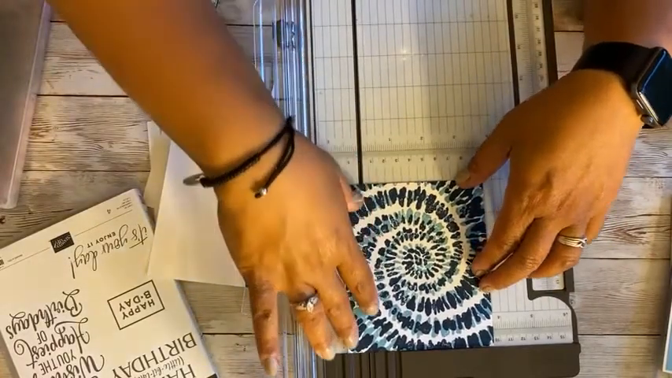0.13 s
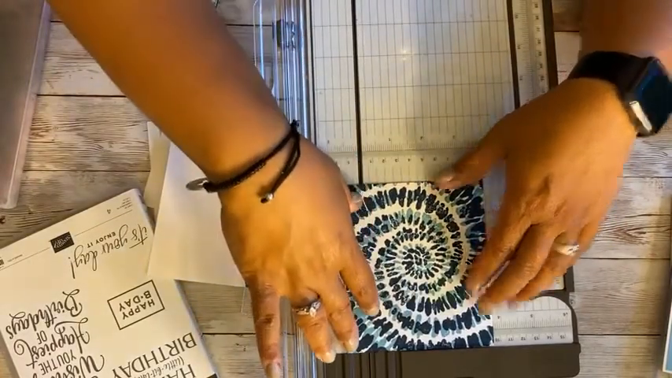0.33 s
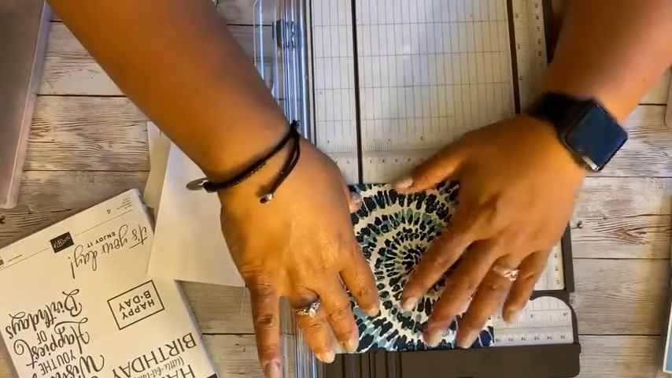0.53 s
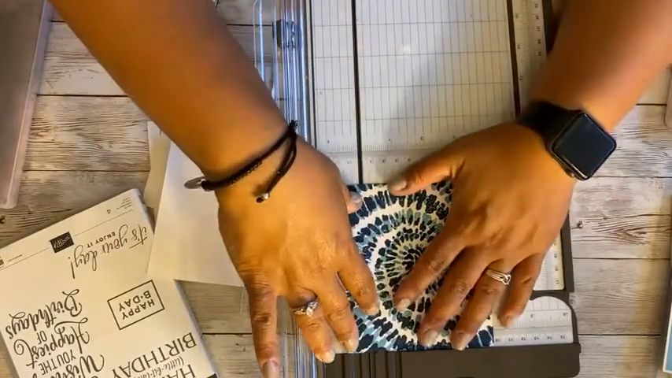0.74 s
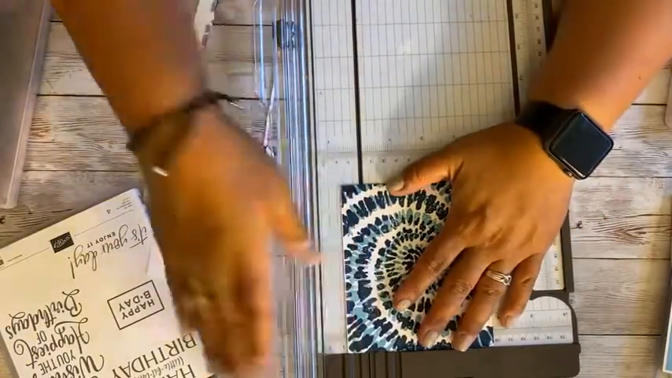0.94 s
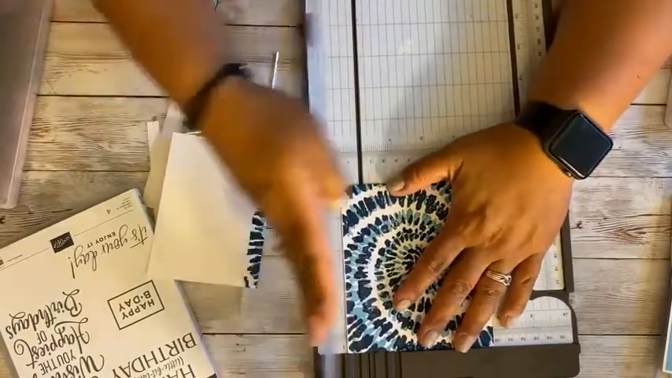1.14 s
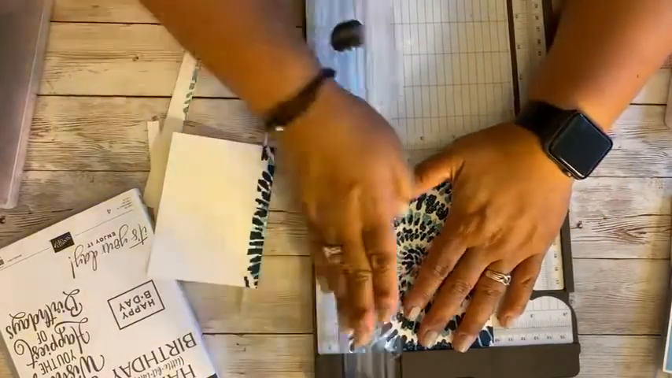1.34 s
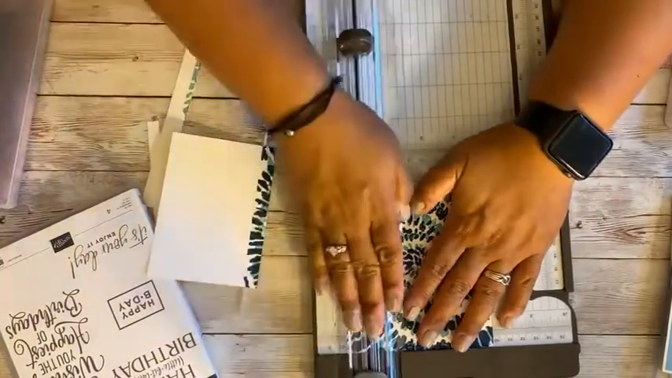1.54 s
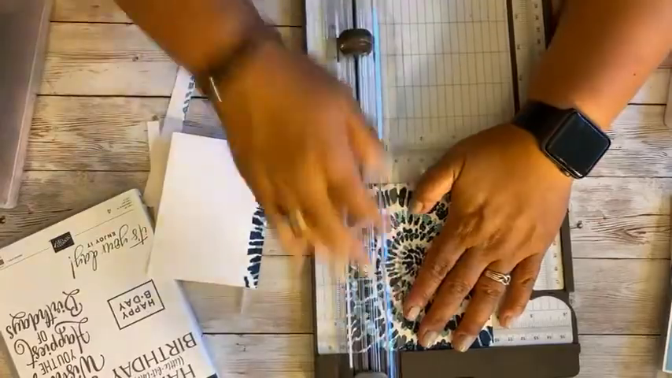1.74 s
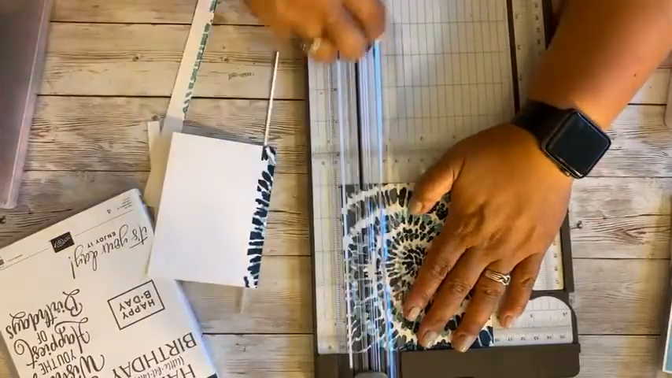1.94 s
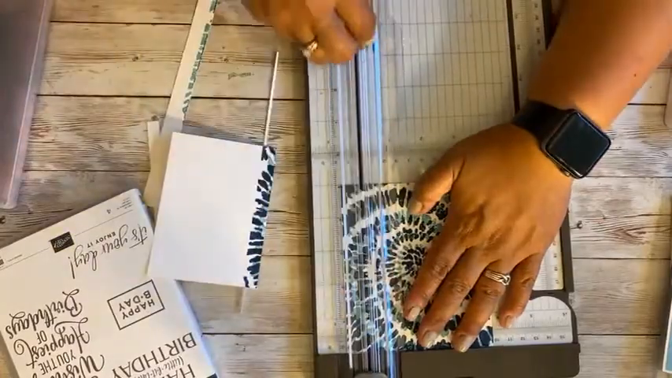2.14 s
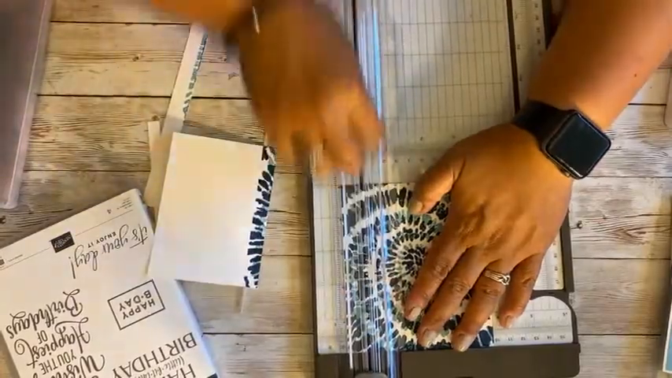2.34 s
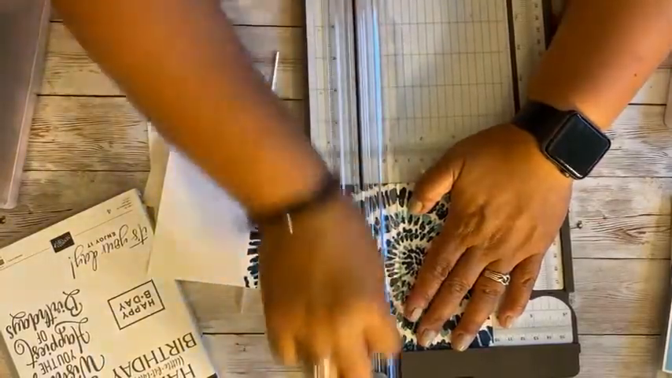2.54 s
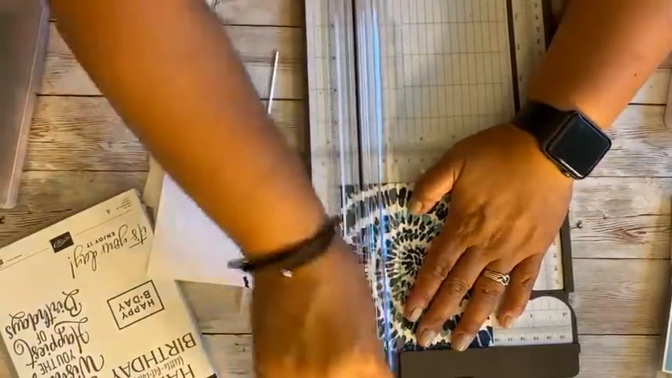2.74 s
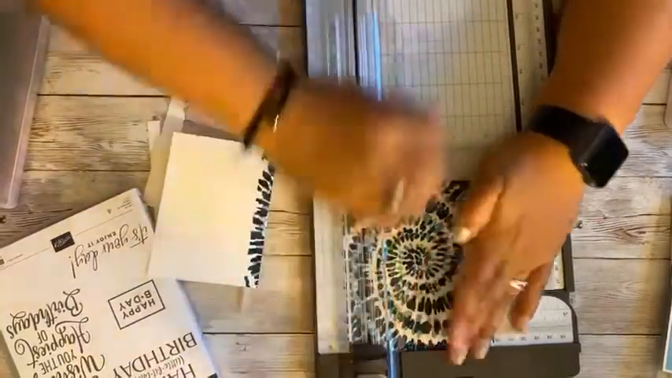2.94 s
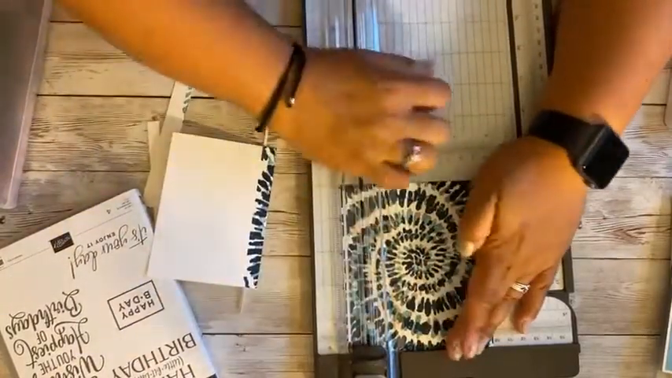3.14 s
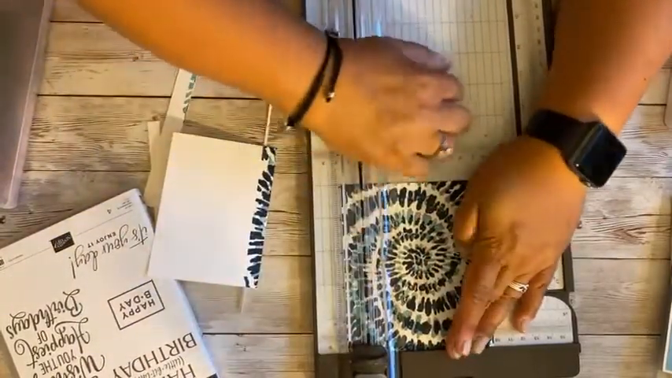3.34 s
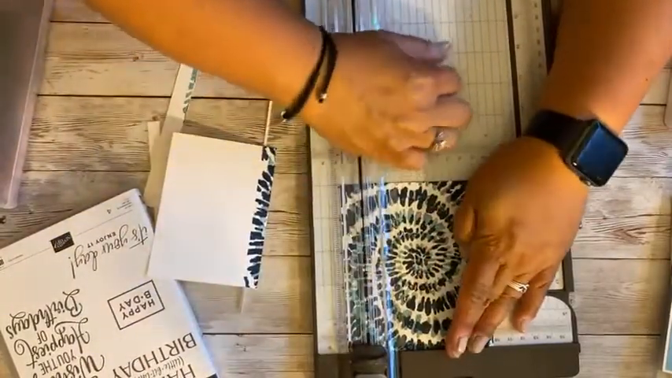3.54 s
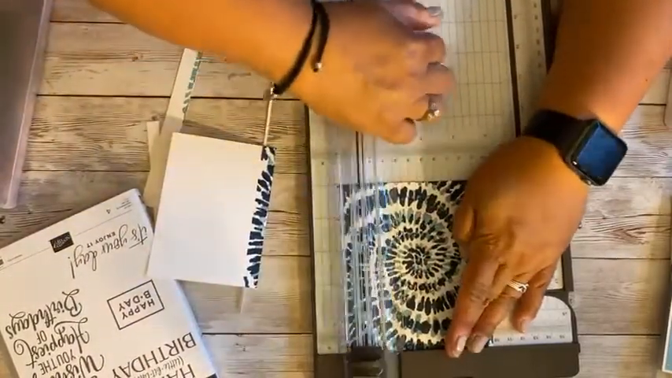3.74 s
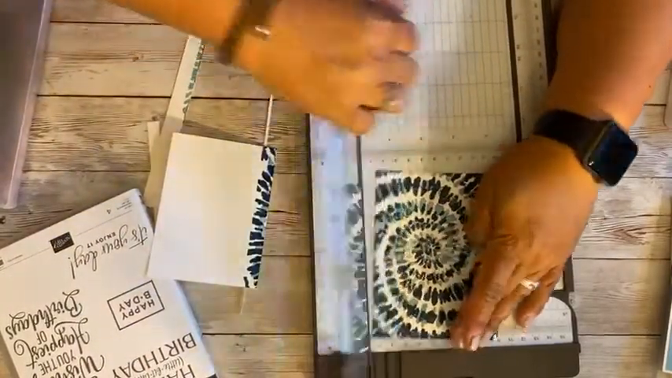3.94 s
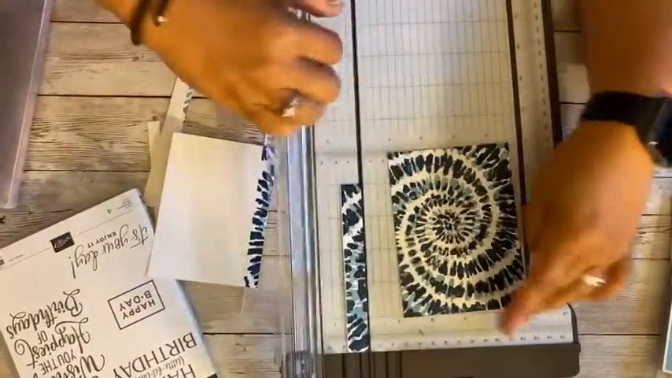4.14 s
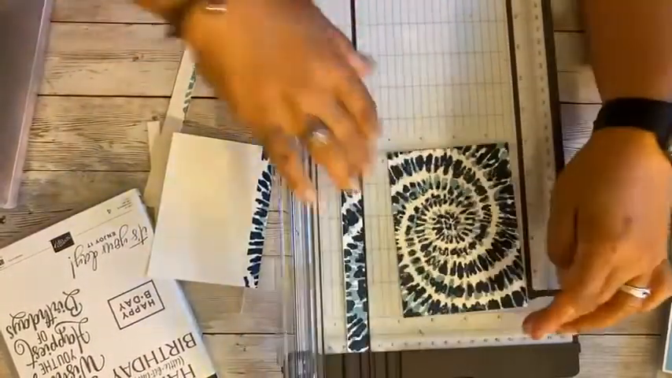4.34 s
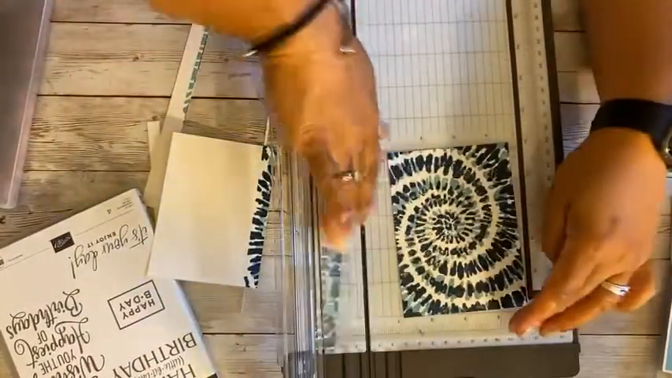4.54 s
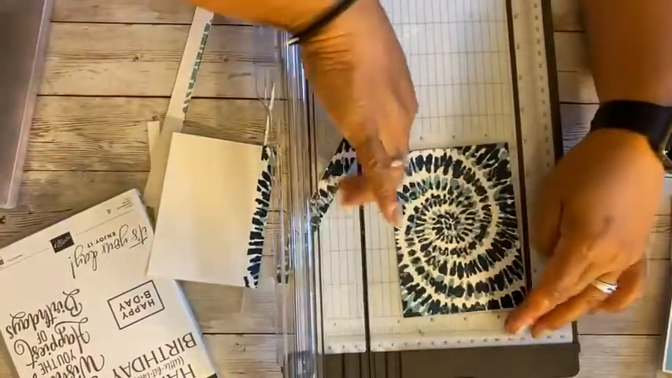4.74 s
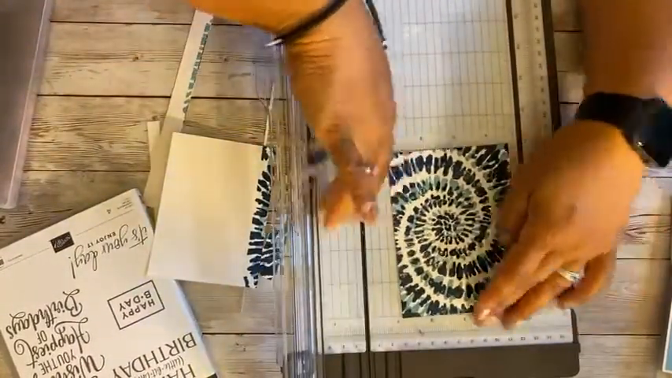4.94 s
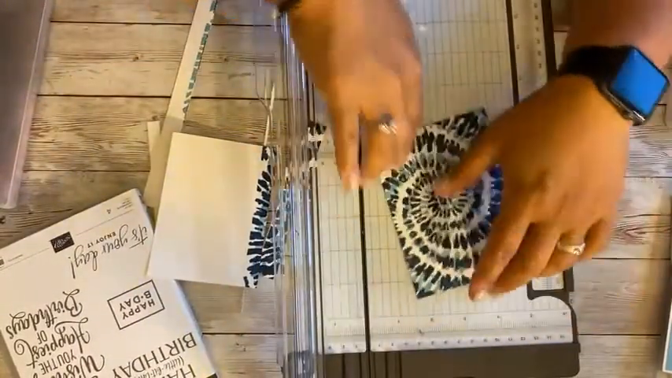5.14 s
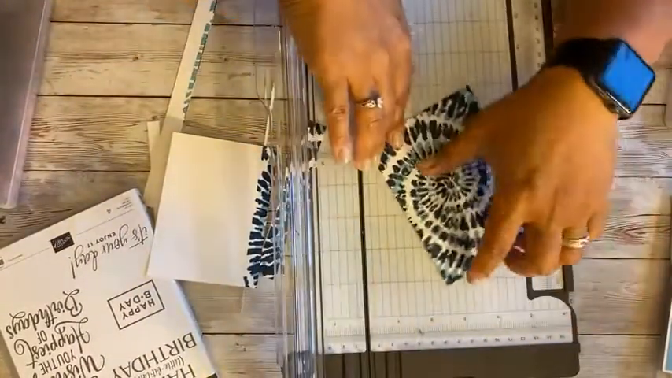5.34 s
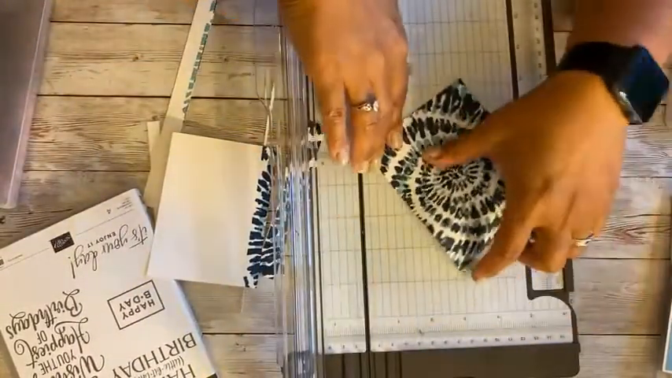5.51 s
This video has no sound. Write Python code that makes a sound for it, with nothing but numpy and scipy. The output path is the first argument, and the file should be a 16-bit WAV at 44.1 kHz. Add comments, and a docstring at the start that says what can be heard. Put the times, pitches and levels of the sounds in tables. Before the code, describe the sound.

Over faint rumble, a trimmer rail slams with a bright clatter, a short cutting rasp ends in a stop, then card shuffles and taps.

```python
"""A low rumble under faint hiss and a few barely audible strokes, then card is cut at a craft table in a small dry room.
An offcut is tossed aside, the guide rail of a plastic sliding-blade trimmer slams shut and chatters,
the blade rasps through the card and hits its stop, the rail is lifted open and the card is slid about.
Rumble is shaped noise, strokes and rasp are bursts of tiny fibre clicks, and blows ring the trimmer's resonances.
One microphone overhead hears it all through direct sound and dense short echoes."""
import sys
import numpy as np
from scipy import signal
from scipy.fft import rfft, irfft, next_fast_len
from scipy.io import wavfile
from scipy.ndimage import uniform_filter1d

SR = 44100
rng = np.random.default_rng(int(sys.argv[2]) if len(sys.argv) > 2 else 0)


def file_out(sig):
    """Save sig as 16-bit WAV at sys.argv[1]."""
    # one column per channel
    cols = np.atleast_2d(sig).T
    # limit, then scale
    lim = np.clip(cols, -1, 1)
    pcm = np.round(lim * 32767).astype(np.int16)
    wavfile.write(sys.argv[1], SR, pcm)


N = 245962  # length of the scene in samples
SIZE = 16384  # length of a blow or a room response in samples


def undb(db):
    """Decibels to gain."""
    return 10 ** (np.asarray(db) / 20)


def unit(x):
    """Scale to rms 1."""
    return x / np.sqrt(np.mean(x ** 2))


def bins(size):
    """Frequencies of a real spectrum in Hz, with the lowest raised to 1."""
    return np.maximum(np.arange(size // 2 + 1) * SR / size, 1)


def contour(points, size):
    """Join (Hz, dB) points on a log-frequency axis."""
    hz, db = np.transpose(points)
    return np.interp(np.log(bins(size)), np.log(hz), db)


def shape(x, db):
    """Filter causally with the given gain in every bin, so that peaks ring after a blow."""
    size = 2 * (len(db) - 1)
    # folding the cepstrum onto positive times gives minimum phase
    cepstrum = irfft(db * np.log(10) / 20)
    cepstrum[1:size // 2] *= 2
    cepstrum[size // 2 + 1:] = 0
    response = np.exp(rfft(cepstrum))
    return irfft(rfft(x, size) * response)


def add(out, s, x):
    """Mix x into out from time s on."""
    start = max(int(s * SR), 0)
    part = x[:max(len(out) - start, 0)]
    out[start:start + len(part)] += part


def resonances(modes, size):
    """Lift in dB of a set of (Hz, width in Hz, dB) resonances."""
    f = bins(size)
    return sum(db / (1 + (2 * (f - hz) / width) ** 2) for hz, width, db in modes)


# Resonances of the plastic bed and rail on the table:
# (frequency [Hz], width [Hz], lift at full coupling [dB])
TRIMMER_MODES = [(123, 20, 5), (222, 37, 8), (353, 46, 4.5), (420, 25, 6.5), (514, 24, 8.5),
                 (623.5, 67, 6.5), (682, 33, 6.5), (809, 50, 6), (1016, 32, 6), (1136, 26, 1.5),
                 (1231, 20, 6.5), (1360, 29, 5), (1560, 54, 3), (1790, 26, 6.5), (2210, 37, 7.5),
                 (3365, 68, 5), (3602, 86, -2.5), (3770, 24, 2.5), (4565, 52, 6), (4820, 46, 4),
                 (5290, 51, 9), (5665, 44, 6.5), (7021, 23, 4)]


def trimmer(size):
    """Plastic bed and rail favour their own resonances in whatever shakes them."""
    return resonances(TRIMMER_MODES, size)


# Frequencies that the band levels of a contact are pinned to: (frequency [Hz])
CONTACT_BANDS = [280, 620, 1900, 3300, 5200, 9000, 15500]
# How a contact's energy is spread: (frequency [Hz], density relative to the band levels [dB per Hz])
CONTACT_SPREAD = [(30, -2.5), (100, 13.5), (160, 13), (235, 13), (450, 10), (700, 6), (1000, 7.5),
                  (1600, 8), (2600, 6), (4200, 5.5), (5600, 1), (7500, 5.5), (10000, 2.5), (15500, -3)]


def contact_colour(thump, body, snap, air, size, carry=0.84, top_db=4):
    """Spectrum of a contact from its four band levels; the slope from snap to air carries on to the top."""
    top = air + carry * (air - snap) + top_db
    levels = [thump, body, body, snap, snap, air, top]
    return contour(list(zip(CONTACT_BANDS, levels)), size) + contour(CONTACT_SPREAD, size)


# The small room's answer to a click, before its tone is evened out: (time [s], level [dB])
ROOM_DECAY = [(0, -1.5), (.005, 1.5), (.012, 1.5), (.023, -4), (.06, -16), (.12, -35.5), (.37, -77)]
TREBLE_HZ, TREBLE_LOSS_DB_PER_S = 7030, 79


def room(direct, echo_db=9, echo_share=0.013):
    """Path to the microphone: direct sound, piled-up echoes of table and walls, then a short tail; energy 1."""
    t = np.arange(SIZE) / SR
    strong = rng.random(SIZE) < echo_share
    echoes = unit(rng.standard_normal(SIZE) * (1 + undb(echo_db) * strong))
    # soft furnishings swallow the treble first
    lowpass = signal.butter(2, TREBLE_HZ, fs=SR, output="sos")
    low = signal.sosfiltfilt(lowpass, echoes)
    treble = (echoes - low) * undb(-TREBLE_LOSS_DB_PER_S * t)
    path = (low + treble) * undb(np.interp(t, *np.transpose(ROOM_DECAY)))
    path[0] += direct
    # the room itself is even in tone: no broad band stands out
    power = uniform_filter1d(np.abs(rfft(path)) ** 2, size=71)
    return shape(path, -10 * np.log10(power))


def fibres(size, per_s, spread_db):
    """Paper fibres catch and let go: dense tiny clicks of very unequal size."""
    caught = rng.random(size) < per_s / SR
    strength_db = spread_db * np.minimum(rng.exponential(size=size), 4)
    return unit(caught * rng.standard_normal(size) * undb(strength_db))


# Colour of the house rumble and hiss: (frequency [Hz], relative density [dB per Hz])
RUMBLE_COLOUR = [(28, -34.5), (48, -1.5), (173, -0.5), (261, -3), (348, -3), (413, -6.5), (455, -6),
                 (513, -7.5), (702, -7.5), (894, -11), (1800, -17.5), (2240, -19.5), (6190, -21),
                 (15500, -35.5)]


def room_tone(level_db=-69):
    """Steady low rumble of the house under a faint hiss: noise through a fixed filter."""
    size = 2 * next_fast_len(N // 2 + 1)
    noise = shape(rng.standard_normal(size), contour(RUMBLE_COLOUR, size))
    return undb(level_db) * unit(noise[:N])


# Strokes of card and fingers over the bed; a flat card sounds dull, an edge or fingertip airy:
# (time of the peak [s], length [s], level before the layer gain [dB],
#  hardness: snap relative to level [dB], air relative to level [dB])
STROKES = [ (0.135, 0.12, -75, 3.5, 0.5), (0.908, 0.048, -72, -3, -5), (1.026, 0.035, -74, 1, -6),
           (1.239, 0.13, -54, -4.5, -22), (1.36, 0.08, -65, -4, -8), (1.57, 0.088, -65.5, -0.5, -2.5),
           (2.401, 0.53, -75, 1, -8), (2.857, 0.067, -71.5, 8, -6), (3.386, .1, -59, -1.5, -11.5),
           (3.498, .19, -59, -6.5, -16), (3.653, .15, -52.5, -9.5, -19.5), (3.808, 0.094, -50.5, -13, -25),
           (3.855, 0.096, -44.5, 0.5, -15.5), (3.956, .13, -62.5, -3, -21), (4.039, .055, -56, -8.5, -20),
           (4.094, .07, -57.5, -1.5, -11.5), (4.181, 0.19, -60.5, -10.5, -17), (4.588, 0.062, -69.5, -5, 1),
           (4.652, .09, -63, 0, -2.5), (4.799, 0.096, -70.5, -3.5, -5), (5.119, 0.067, -62.5, -4, -5),
           (5.317, .12, -67, -12, -12.5), (5.422, .05, -65, -8, -15), (5.559, 0.21, -66.5, 1, -10.5)]
RISE_SHARE = .43  # part of a stroke spent speeding up
STROKE_THUMP_DB = -3  # relative to the stroke's level


def slides(gain_db=-1.0, coupling=0.12):
    """Each stroke swells and fades with its speed; its friction passes partly through the bed."""
    out, size = np.zeros(N), 2 * SIZE
    t, plastic = np.arange(size) / SR, trimmer(size)
    for s, length, db, hardness, air in STROKES:
        rise = RISE_SHARE * length
        speed = np.sin(np.pi / 2 * np.interp(t, [0, rise, length], [0, 1, 0]))
        friction = speed * fibres(size, per_s=1400, spread_db=4.0)
        rub = signal.fftconvolve(friction, room(direct=5))[:size]
        colour = contact_colour(db + STROKE_THUMP_DB, db, db + hardness, db + air, size)
        # the room's echoes make the stroke peak a little late
        add(out, s - rise - .01, shape(rub, colour + coupling * plastic + gain_db))
    return out


# Blows on trimmer and table: offcut landing, rail slam and chatter, hand on the carriage, bite, stop,
# hollow knock on the bed, rail snapping free and swinging open, card shifting, fingers on the strip:
# (time [s], body level before the layer gain [dB], hardness: snap relative to body [dB],
#  weight: thump relative to body [dB], resonance of the struck spot [Hz], lead of the first touch [s])
TRIMMER_BLOWS = [ (1.173, -48, -3, -9, 1350, 0.016), (1.189, -50, -3.5, -10, 2200, 0.013),
                 (1.208, -51, -7, -14, 1770, 0.00077), (1.249, -58, -9, -7, 1520, 0),
                 (1.345, -59.5, -6, 3.5, 1130, 0.0086), (1.575, -61, 8, -22, 7300, 0),
                 (1.586, -34, 3.5, -10, 1740, 0.0023), (1.594, -34, 12, -1, 1230, 0),
                 (1.602, -26.5, 2, -12, 1720, 0.0057), (1.609, -35.5, 3.5, 1, 230, 0.0059),
                 (1.767, -66, 3, -5, 7040, 0), (1.787, -52, 2, -23, 1120, 0.0035),
                 (2.062, -48, 0, -2, 1080, 0.014), (2.123, -61, -7, 6, 880, 0.0038),
                 (2.178, -58.5, -5.5, -3.5, 1210, 0.0096), (2.511, -53, 8, -3.5, 197, 0.0016),
                 (2.743, -45.5, 11.5, 2.5, 3900, 0.0096), (2.748, -42.5, -12, -3.5, 488, 0.0032),
                 (2.902, -48, -0.5, -9, 1210, 0.0059), (3.131, -46, -6.5, -0.5, 726, 0.0017),
                 (3.135, -45, -14, 1, 563, 0.0033), (3.294, -45, -1, -2.5, 1520, .013),
                 (3.331, -44.5, -7.5, 0.5, 393, 0.0019), (3.36, -56, -4, 0, 1030, 0.0042),
                 (3.549, -47.5, -6, -16, 890, 0), (3.62, -57, -5, -21, 1070, 0.0021),
                 (3.676, -42.5, 2.5, -6.5, 1420, .003), (3.845, -51.5, -4, -6, 1400, 0.0084),
                 (3.862, -48.5, -17.5, -4, 1430, 0.001), (3.929, -55, -2.5, -6, 3470, 0.0049),
                 (4.152, -63, -4, -11, 2010, 0.0076), (4.258, -51.5, -2, 1.5, 666, 0.014),
                 (4.315, -57.5, -5.5, -1, 1390, 0.0043), (4.594, -61, -1.5, -14, 1990, 0.0049),
                 (4.673, -52, -8.5, -2, 230, 0.00042), (5.032, -57.5, -0.5, -9, 1710, 0.0017)]
TOUCH_DB, TOUCH_HARDNESS_DB, TOUCH_WEIGHT_DB = -7.5, 2.5, -4  # the first touch, relative to its blow
KNOCK_AIR_DB = -12.5  # relative to snap


def blows():
    """Give every blow a lighter, harder touch before it, or with it where the lead is 0."""
    for s, db, hardness, weight, hz, lead in TRIMMER_BLOWS:
        touch = (s - lead, db + TOUCH_DB, hardness + TOUCH_HARDNESS_DB, weight + TOUCH_WEIGHT_DB)
        blow = (s, db, hardness, weight)
        for at, body, hard, heavy in (touch, blow):
            snap = body + hard
            yield at, body + heavy, body, snap, snap + KNOCK_AIR_DB, hz


SPOT_LIFT_DB = 7.5  # for a blow of hardness 0
SPOT_LIFT_PER_HARDNESS = -0.4  # dB per dB: a soft blow favours its spot more than a hard one


def knocks(gain_db=25.5, focus=0.33, shared=0.12, direct=0.2, beam=0.42):
    """Every blow rings the trimmer, with an extra lift at the resonance under the struck spot."""
    out, plastic, common = np.zeros(N), trimmer(SIZE), room(direct=0)
    for s, thump, body, snap, air, hz in blows():
        lift = SPOT_LIFT_DB + SPOT_LIFT_PER_HARDNESS * (snap - body)
        spot = resonances([(hz, focus * hz, lift)], SIZE)
        # spots lie close together, so part of the echo pattern is the same for all
        path = np.sqrt(shared) * common + np.sqrt(1 - shared) * room(direct=0)
        # dull knocks come from the flat bed, which faces the microphone; bright clicks scatter round the room
        straight = direct * undb(beam * (body - snap))
        path[0] += straight
        path /= np.hypot(1, straight)
        colour = contact_colour(thump, body, snap, air, SIZE) + plastic + spot
        add(out, s, shape(path, colour + gain_db))
    return out


# Soft bumps of hands and card on the table:
# (time [s], thump level before the layer gain [dB], resonance that the spot favours [Hz])
SOFT_BUMPS = [(1.187, -50, 95), (1.636, -45, 126.6), (2.213, -59.5, 440), (2.269, -60, 202),
              (4.458, -65, 291), (4.704, -57.5, 240), (4.79, -64.5, 124.2), (4.995, -54, 129.3),
              (5.285, -61.5, 238), (5.412, -61, 706), (5.435, -55.5, 453)]
BUMP_BODY_DB, BUMP_SNAP_DB, BUMP_AIR_DB = -13, -16, -36  # relative to the thump
BUMP_LIFT_DB, BUMP_FOCUS = 11.5, .3  # spot resonance: lift, and width as a share of its frequency


def bumps(gain_db=24.5, coupling=0.71):
    """Hands and card come down softly: dull thumps on the table, partly ringing the trimmer."""
    out = np.zeros(N)
    colour = contact_colour(0, BUMP_BODY_DB, BUMP_SNAP_DB, BUMP_AIR_DB, SIZE) + coupling * trimmer(SIZE)
    for s, db, hz in SOFT_BUMPS:
        spot = resonances([(hz, BUMP_FOCUS * hz, BUMP_LIFT_DB)], SIZE)
        add(out, s, shape(room(direct=0), colour + spot + db + gain_db))
    return out


# Colour of the rasp before the trimmer and the tilt: (frequency [Hz], relative density [dB per Hz])
RASP_COLOUR = [(35, -40), (60, -34.5), (118, -5), (149, 2), (187, 2.5), (259, -3.5), (368, -4), (627, -5.5),
               (688, -5), (810, 1.5), (976, -4), (1700, 1.5), (2410, -3.5), (5200, -3.5), (15500, -22.5)]
# The blade skims up to the edge, bites, and runs on until the stop
CUT_S, STOP_S = 2.514, 2.742  # times of full effort and of the stop
SKIM_S, BITE_S, RELEASE_S = .05, .018, 0.028  # durations
SKIM_DB = -14.5  # effort at the end of the skim, relative to full effort
CUT_DB, CUT_SAG_DB_PER_S = -46.5, -17
GRAIN_PER_S, GRAIN_DB = 160, 0.8  # the card resists unevenly
TILT_DB = 1  # the dull part drops by this, the bright part rises by twice this


def blade(coupling=0.14, pivot_hz=3000):
    """The blade severs fibres one after another; the rasp is louder the harder it cuts."""
    size = 2 * SIZE
    bite = CUT_S - BITE_S
    start = bite - SKIM_S
    t = start + np.arange(size) / SR
    effort = np.interp(t, [start, bite, CUT_S, STOP_S, STOP_S + RELEASE_S], [0, undb(SKIM_DB), 1, 1, 0])

    colour = contour(RASP_COLOUR, size) + coupling * trimmer(size)
    rasp = unit(shape(fibres(size, per_s=3700, spread_db=1), colour))
    dull = signal.sosfiltfilt(signal.butter(1, pivot_hz, fs=SR, output="sos"), rasp)
    tilted = dull * undb(-TILT_DB) + (rasp - dull) * undb(2 * TILT_DB)

    grain = np.interp((t - start) * GRAIN_PER_S, np.arange(size), rng.standard_normal(size))
    level_db = CUT_DB + CUT_SAG_DB_PER_S * (t - CUT_S) + GRAIN_DB * grain
    cut = tilted * effort * undb(level_db)
    out = np.zeros(N)
    add(out, start, signal.fftconvolve(cut, room(direct=4.6)))
    return out


def scene():
    """One microphone feeds both channels."""
    mono = room_tone() + slides() + knocks() + bumps() + blade()
    return np.array([mono, mono])


def record(dry):
    """The recorder cuts the top steeply above 15720 Hz."""
    lowpass = signal.ellip(12, .1, 80, 15720, fs=SR, output="sos")
    return signal.sosfilt(lowpass, dry)


dry = scene()
out = record(dry)
file_out(out)
```